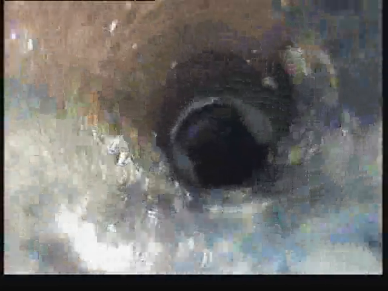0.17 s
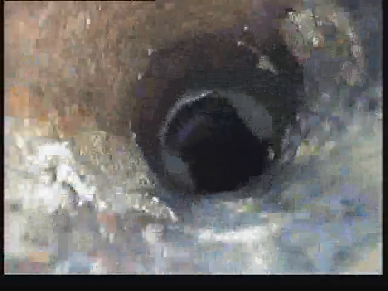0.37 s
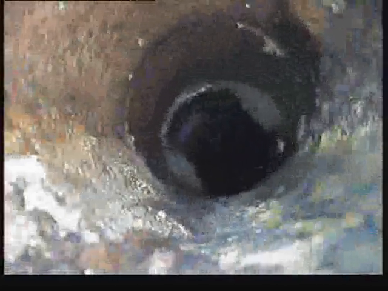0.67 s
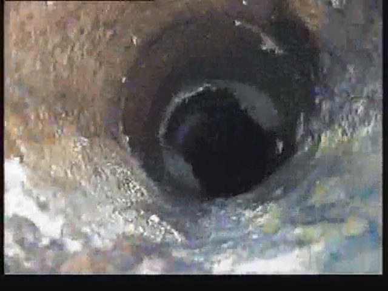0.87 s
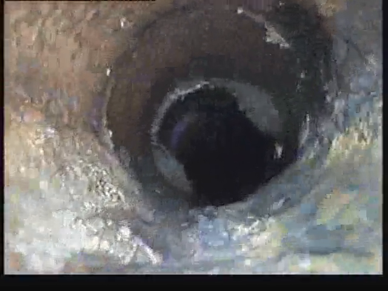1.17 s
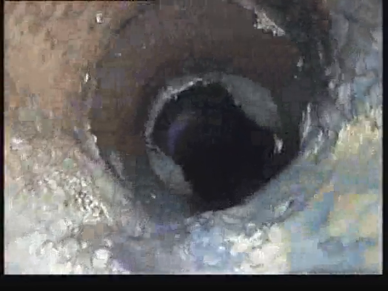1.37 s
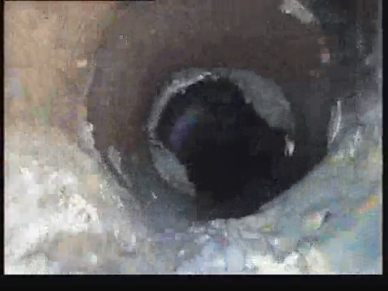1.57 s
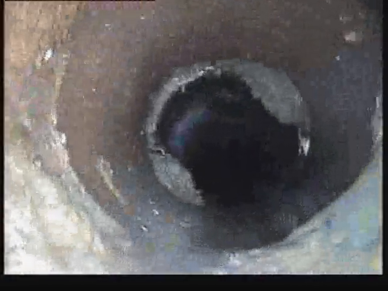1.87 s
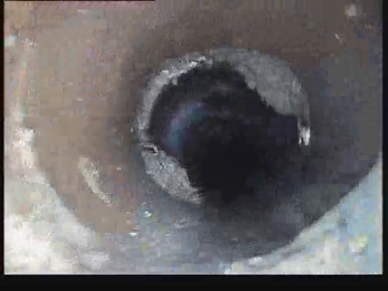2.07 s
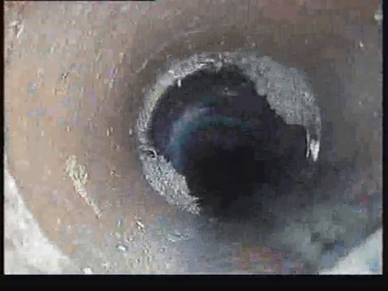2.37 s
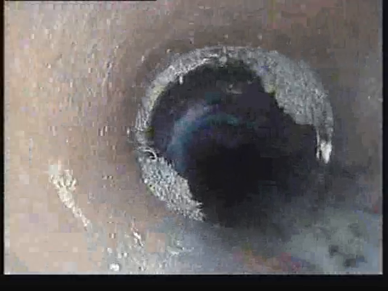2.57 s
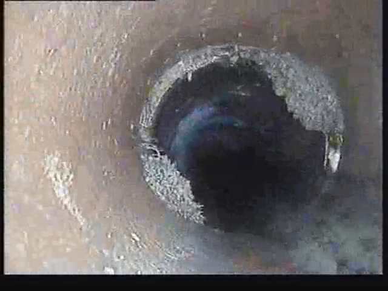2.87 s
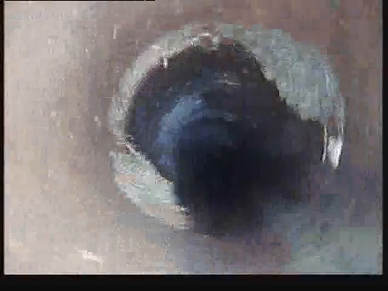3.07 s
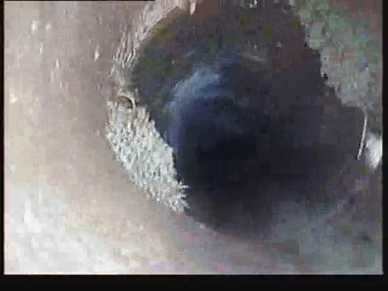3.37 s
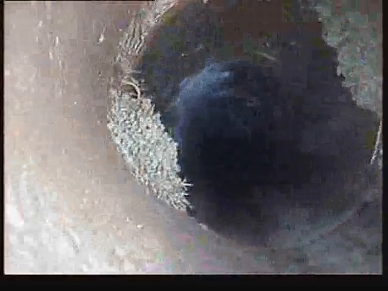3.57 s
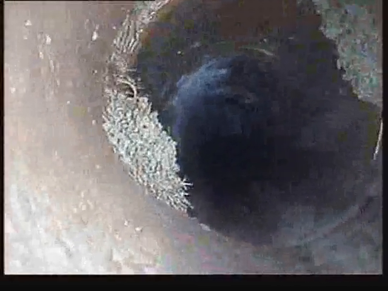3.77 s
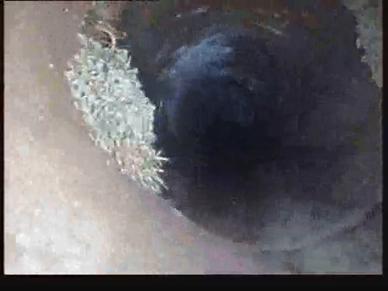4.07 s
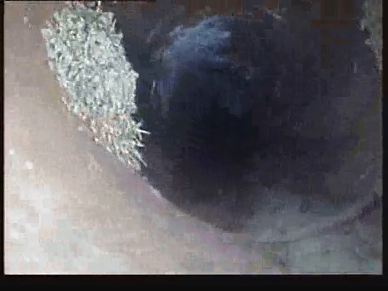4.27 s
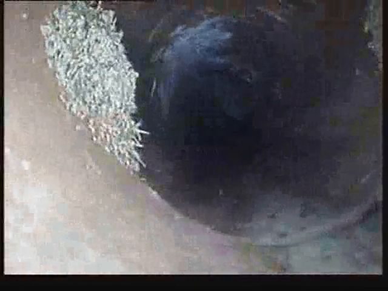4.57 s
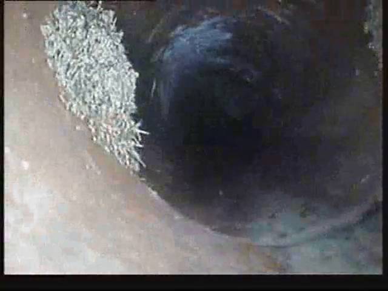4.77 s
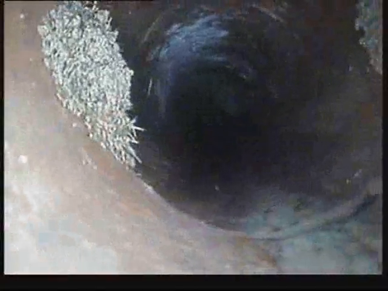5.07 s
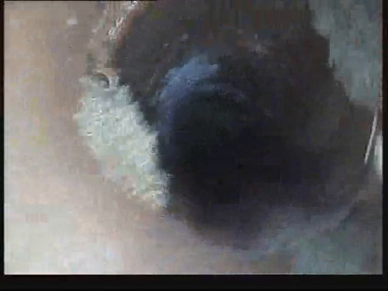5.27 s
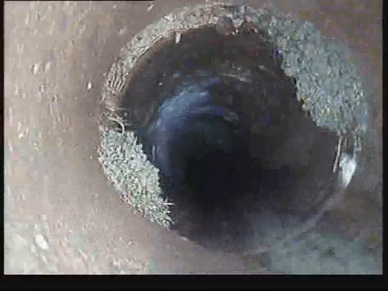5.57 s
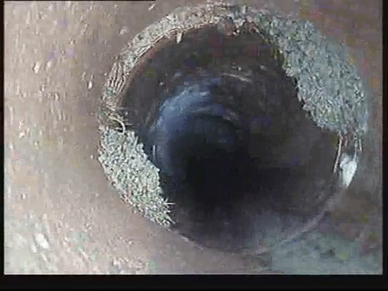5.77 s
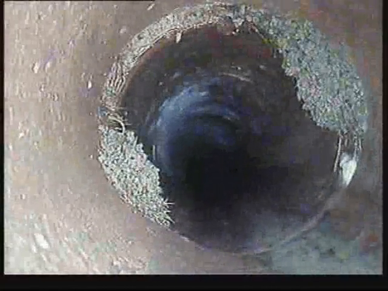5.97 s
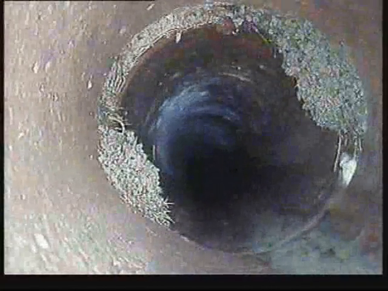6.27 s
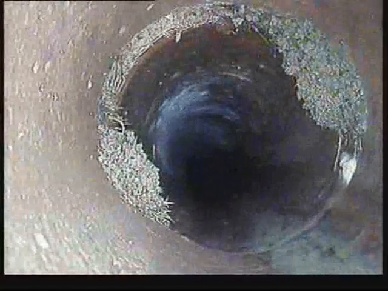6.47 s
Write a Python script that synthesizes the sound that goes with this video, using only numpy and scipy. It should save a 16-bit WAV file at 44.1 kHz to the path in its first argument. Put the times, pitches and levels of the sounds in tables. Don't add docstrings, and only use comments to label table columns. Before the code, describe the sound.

Only the electronics of a pipe inspection camera are heard, with nothing from the pipe itself. A thin high whine runs throughout, fluttering rapidly and dipping briefly two or three times a second. Beneath it lie steady hiss and a fine raspy buzz. Small sharp ticks come in uneven bunches about once a second, with very faint low bumps. There is no microphone, room or distance; the sound is dry, single-channel and dull at the very top.

```python
import sys
import numpy as np
from scipy import signal
from scipy.fft import rfft, irfft
from scipy.io import wavfile

SR = 44100
rng = np.random.default_rng(int(sys.argv[2]) if len(sys.argv) > 2 else 0)


def volts_from_decibels(level):
    exponent = np.asarray(level, float) / 20
    return 10 ** exponent


def int16_out(signal):
    q = np.round(np.clip(np.atleast_2d(signal).T, -1, 1) * 32767)
    wavfile.write(sys.argv[1], SR, q.astype(np.int16))


N = 292414
T = np.arange(N) / SR

# time in seconds, pitch in Hz.
SETTLED_PITCH = [(0.002, 2597), (0.379, 2598), (0.817, 2613), (1.117, 2626), (1.498, 2624), (2.374, 2636),
                 (2.737, 2642), (3.369, 2643), (3.81, 2650), (4.273, 2645), (4.771, 2652), (5.17, 2639),
                 (5.688, 2626), (5.972, 2604), (6.275, 2583)]
# time in seconds, drop in Hz.
LOAD_DROP = [(0, 4.9), (2.7, 10), (2.85, 23), (3.1, 38.6), (3.45, 51), (3.6, 22), (3.8, 18.4), (4.35, 63),
             (4.6, 30), (4.85, 49), (5.1, 49), (5.8, 102), (6.63, 132)]
LOAD_CYCLE = [(0, -.5), (.21, -.55), (.25, .45), (.66, .5), (.7, -0.22), (.75, 0.414), (.79, .3),
              (.84, -.45), (1, -.5)]
# start in seconds, delays of the three pages in ms (three columns), pitch drop in Hz.
MEMORY_WRITES = [(0.002, 3.5, 23, 26, 140), (0.379, 5.5, 7.9, 13.4, 140), (0.817, -0.5, 12, 23, 164),
                 (1.117, -4, 9, 29, 145.3), (1.498, 8, 15, 26, 123.6), (1.937, -0.5, 13, 23.3, 195.2),
                 (2.374, 10, 16.6, 28, 185), (2.737, 10.5, 15.5, 24.7, 175), (3.012, 4.5, 17.5, 27, 235),
                 (3.369, 12, 21.5, 28.5, 211), (3.81, 13, 20.7, 29, 188.8), (4.273, -1.5, 11, 32, 206.2),
                 (4.771, 10, 19.05, 24.6, 213), (5.17, 15, 21, 25, 231), (5.688, 3.5, 23.3, 26, 200.8),
                 (5.972, 15, 22, 29, 223.7), (6.275, 1.5, 8, 30, 205.7), (6.571, 7.5, 20, 28, 205)]
# multiple of the pitch, fixed partner in Hz, rms level in dB.
WHINE_PRODUCTS = [
    (1, 0, -48.3),
    (2, 0, -66.5),
    (1, 3902, -76),
    (-1, 3902, -75),
    (-1, 12100, -71),
    (-2, 16001.5, -73),
]
# frequency in Hz, gain in dB.
RAIL_COLOUR = [(75, -36), (90, -2.5), (200, 13.5), (400, 18.5), (700, 2)]
# low, middle and high tone in Hz.
COLOUR_BURST_HZ = (197.26, 4197.82, 11804.44)
# frequency in Hz, gain in dB.
HISS_AND_BUZZ_COLOUR = [(75, -11), (88, 4.5), (160, -24), (185, 4), (400, 3), (900, 1), (2200, 1.5), (4500, -0.5),
                        (7000, -2.5), (10400, -5.5), (12600, -8.5)]
CLOCK_TONES_HZ = (197.26, 375, 402, 600.05, 750, 1008.6, 1125, 4000.6, 4463.6, 5440.6, 5681.6, 6056.6,
                  9945.6, 10321, 10561.8, 11538.7, 11804.4)
# rms levels in dB, in the same order.
CLOCK_LEVELS_DB = (-79, -74, -83, -81, -80, -84, -84, -82, -77, -80, -81, -74, -79, -86, -85, -86, -86)
# field number, shift in ms, peak level in dB.
FIELD_TICKS = [
    (7, -.3, -37.5),
    (14, -.3, -37),
    (16, .15, -39),
    (21, -.27, -34),
    (23, .12, -35.5),
    (28, -.4, -37),
    (30, .1, -34),
    (37, .05, -37),
]
ROUND_LEVELS_DB = (1, 0, 0, -3, -1.5, 1, 0)
# frequency in Hz, gain in dB.
TICK_COLOUR = [(160, -40), (200, -2), (2000, 0), (4500, 0), (7000, -1), (9500, -3), (12600, -6)]
# centre in seconds, peak level in dB, frequency in Hz.
LOW_THUMPS = [(0.374, -66, 106), (0.842, -54, 103), (1.133, -58, 141), (1.468, -60, 172), (1.519, -53, 143),
              (1.92, -65, 154.5), (1.962, -61, 99), (2.185, -64, 117), (2.39, -54.5, 101.9),
              (2.891, -63, 129), (3.036, -56, 127), (3.356, -61, 155), (3.402, -55, 98.2),
              (3.483, -60, 117), (3.547, -60, 146), (3.843, -53.5, 128.6), (3.89, -64, 139),
              (4.402, -64, 142.7), (4.467, -60, 102.6), (4.761, -59, 124.5), (4.924, -64.5, 118.5),
              (5.576, -60, 91), (5.721, -65, 97), (6.291, -67, 136), (6.47, -59.5, 137.2)]

LINE_BEAT_HZ, FIELD_HZ = 265.77, 59.949


def curve(table):
    return np.interp(T, *np.transpose(table))


def window(at, start, length, edge):
    return (np.tanh((at - start) / edge) - np.tanh((at - start - length) / edge)) / 2


def tone(hz, db):
    cycles = np.cumsum(hz * np.ones(N)) / SR + rng.random()
    return np.sqrt(2) * volts_from_decibels(db) * np.cos(2 * np.pi * cycles)


def colour(x, table):
    hz, db = np.transpose(table)
    bins = np.arange(N // 2 + 1) * SR / N + 1
    gain = volts_from_decibels(np.interp(np.log(bins), np.log(hz), db))
    return irfft(rfft(x) * gain, N)


def wander(hz):
    lowpass = signal.butter(2, hz, fs=SR, output="sos")
    x = signal.sosfilt(lowpass, rng.standard_normal(N))
    return x / x.std()


def resting_pitch():
    starts = np.array(MEMORY_WRITES)[:, 0]
    last = starts[np.maximum(np.searchsorted(starts, T) - 1, 0)]
    sag_hz_per_s = np.maximum(40 - 14 * last, -8)
    return np.interp(last, *np.transpose(SETTLED_PITCH)) - sag_hz_per_s * (T - last)


def write_drop():
    page_s, edge_s = 0.0042, 0.0005
    busy_share = 0.38
    out = np.zeros(N)
    for start, first, second, third, drop in MEMORY_WRITES:
        pages = sum(window(T, start + ms / 1000, page_s, edge_s) for ms in (first, second, third))
        busy = window(T, start, third / 1000 + page_s, edge_s)
        out += drop * (busy_share * busy + (1 - busy_share) * np.minimum(pages, 1))
    return out


def supply():
    load_hz, floor_hz = 25.0, 2375
    cycle = (T * load_hz + 0.0323 * wander(hz=29.0)) % 1
    depth = curve(LOAD_DROP)
    load = depth * volts_from_decibels(0.9 * wander(hz=15)) * np.interp(cycle, *np.transpose(LOAD_CYCLE))
    writes = write_drop()

    tremble_hz = 3 + 0.164 * depth + 0.42 * np.maximum(load, 0) + 0.24 * writes
    free = np.clip(1 - writes / 260, 0, 1)
    pulled = resting_pitch() - load * free - writes * (0.9 + 0.0012 * writes)
    pitch = np.maximum(pulled, floor_hz) + tremble_hz * wander(hz=327) + 1.3 * wander(hz=6.06)

    whine = sum(tone(partner + multiple * pitch, db) for multiple, partner, db in WHINE_PRODUCTS)
    rail = volts_from_decibels(-104) * colour(writes + 0.24 * load, RAIL_COLOUR)
    return whine * volts_from_decibels(0.57 * wander(hz=120)) + rail


def picture_lines():
    beat = T * LINE_BEAT_HZ % 1
    gate = window(beat, 0.2006, 0.04, 0.0026)
    low, middle, high = (tone(hz, 0) for hz in COLOUR_BURST_HZ)
    burst = volts_from_decibels(-55) * low + volts_from_decibels(-53) * middle + volts_from_decibels(-61) * high
    burst = burst + volts_from_decibels(-49.5) * rng.standard_normal(N)
    picture = volts_from_decibels(-77.5) * middle
    sync = volts_from_decibels(-71.5) * window(beat, 0.035, 0.19, 0.057)
    sync = sync - volts_from_decibels(-58.5) * window(beat, 0.25, 0.097, 0.031)
    return gate * burst + picture + sync


def field_changes():
    turns = T * FIELD_HZ + 0.5
    strength = volts_from_decibels(rng.uniform(-5, 3, int(turns[-1]) + 1))
    gate = window(turns % 1, 0.455, 0.066, 0.0025)
    return gate * strength[turns.astype(int)] * volts_from_decibels(-54) * rng.standard_normal(N)


def preamplifier(x):
    hiss = volts_from_decibels(-53) * rng.standard_normal(N)
    return colour(hiss + x, HISS_AND_BUZZ_COLOUR)


def clocks():
    return sum(tone(hz + 0.000195 * hz * wander(hz=2.6), db)
               for hz, db in zip(CLOCK_TONES_HZ, CLOCK_LEVELS_DB))


def ticks():
    out = np.zeros(N + 2 * SR)
    field, shift_ms, db = np.transpose(FIELD_TICKS)
    rounds = 60 * np.arange(7)[:, None]
    at_s = ((field + rounds) / FIELD_HZ + shift_ms / 1000).ravel()
    at = (at_s * SR).astype(int)
    sign_draw, level_draw, twin_draw = rng.random((len(at), 3)).T
    scatter_db = 1.3 * 3.4 * (level_draw - 0.5)
    level_db = np.add.outer(ROUND_LEVELS_DB, db).ravel() + scatter_db
    size = np.sign(sign_draw - 0.5) * volts_from_decibels(level_db)
    out[at] = size * volts_from_decibels(7.5)
    out[at - 11] = size * volts_from_decibels(4) * twin_draw

    beats = np.arange(int(T[-1] * LINE_BEAT_HZ))
    small_s = (beats + rng.uniform(0.21, 0.245, len(beats))) / LINE_BEAT_HZ
    out[(small_s * SR).astype(int)] += volts_from_decibels(-48.5 + 8.5) * rng.standard_normal(len(beats))
    return colour(out[:N], TICK_COLOUR)


def low_thumps():
    width_s = 0.013
    out = np.zeros(N)
    for centre, db, hz in LOW_THUMPS:
        since = T - centre
        out += volts_from_decibels(db - 3.5) * np.exp(-(since / width_s) ** 2) * np.sin(2 * np.pi * hz * since)
    return out


def scene():
    amplified = preamplifier(picture_lines() + field_changes())
    offset = 0.0284
    mix = supply() + amplified + clocks() + ticks() + low_thumps() + offset
    return mix[None]


def top_cut(x):
    return signal.sosfilt(signal.butter(12, 12680, fs=SR, output="sos"), x)


def record(dry):
    return top_cut(dry)


dry = scene()
out = record(dry)
int16_out(out)
```